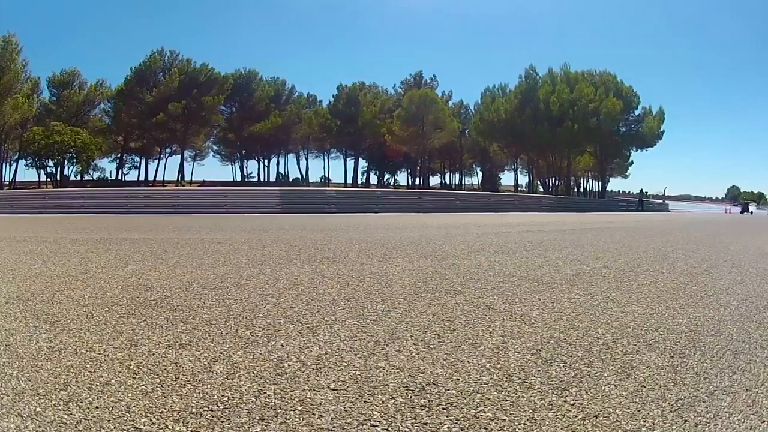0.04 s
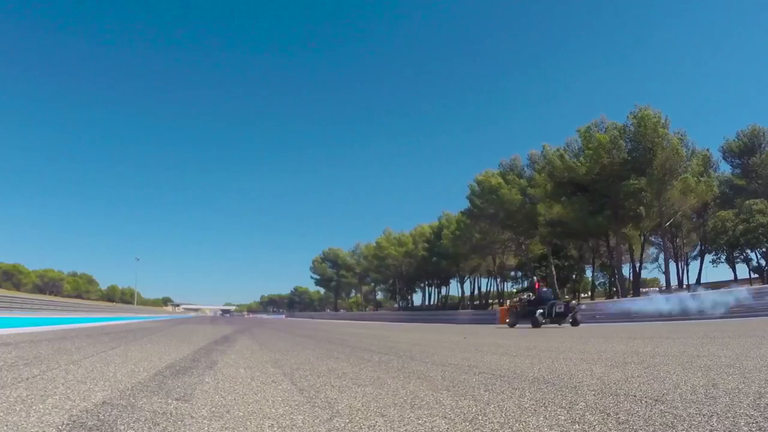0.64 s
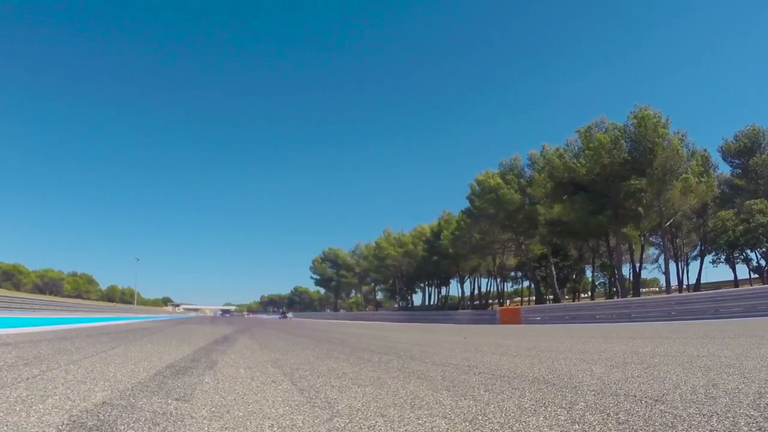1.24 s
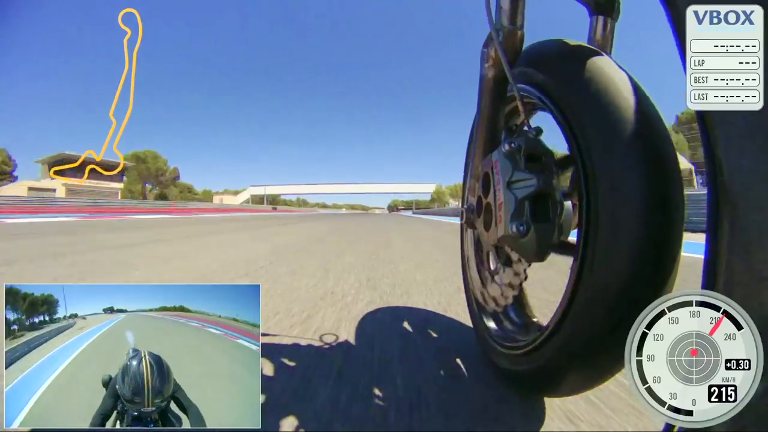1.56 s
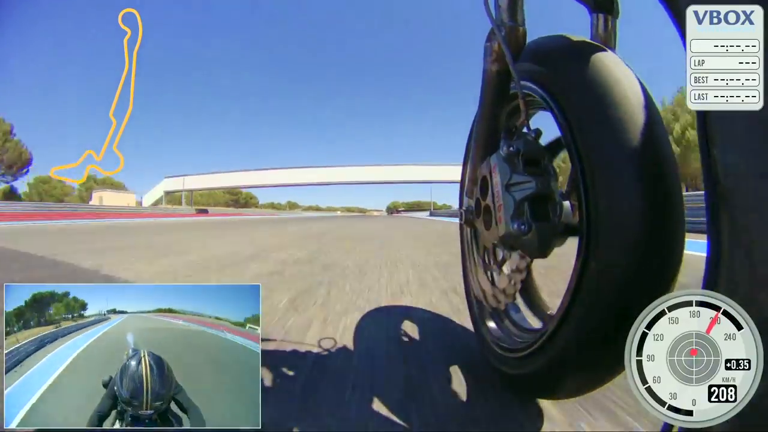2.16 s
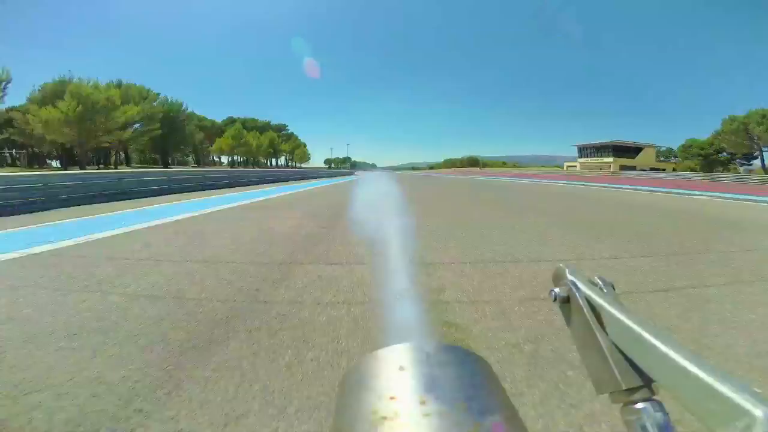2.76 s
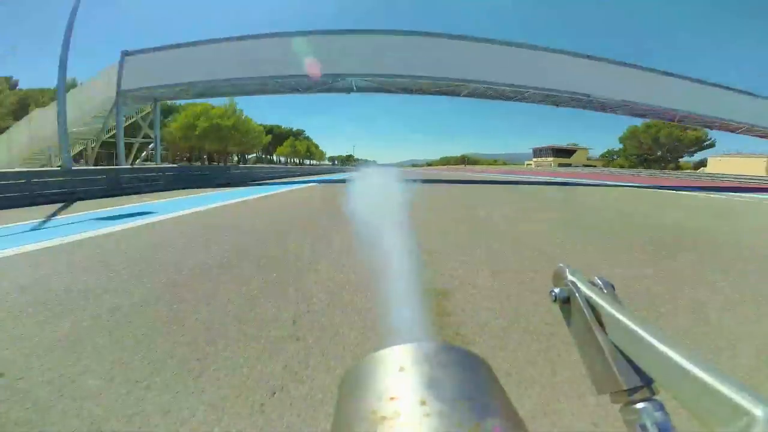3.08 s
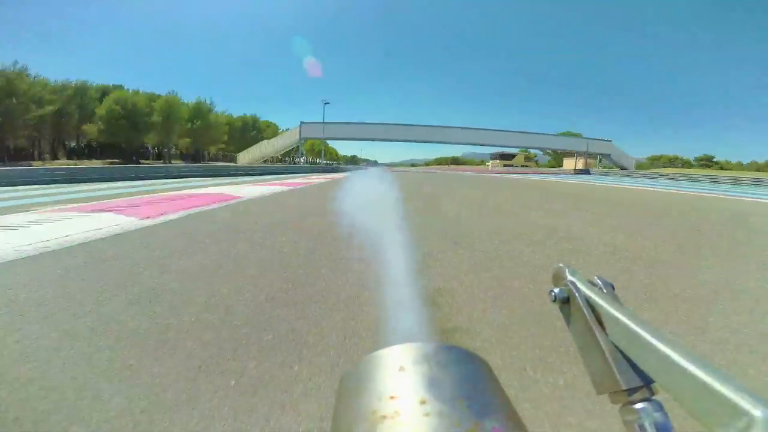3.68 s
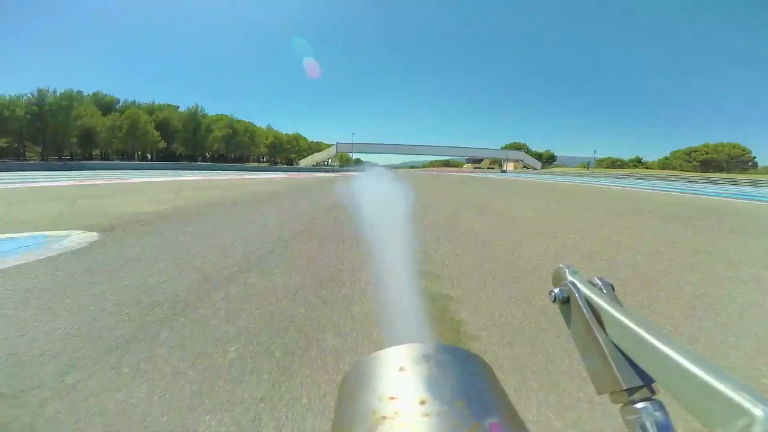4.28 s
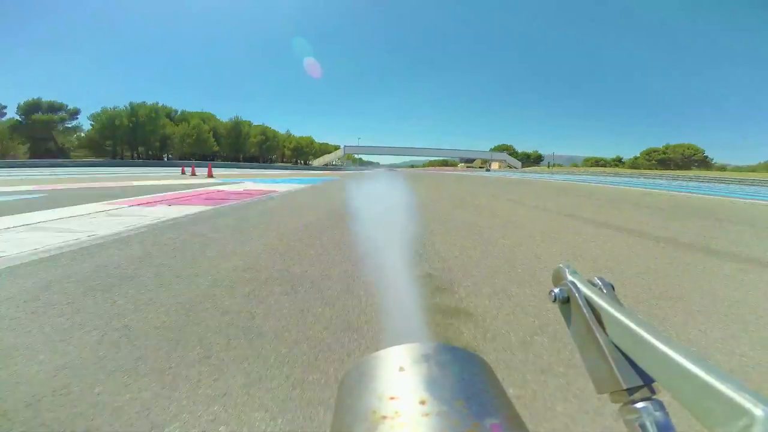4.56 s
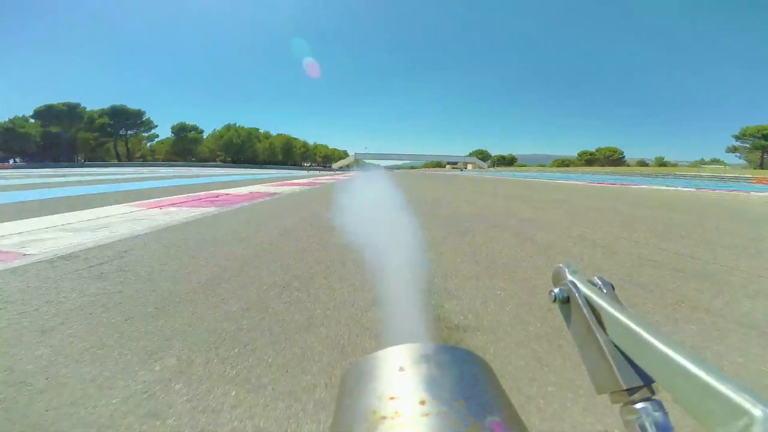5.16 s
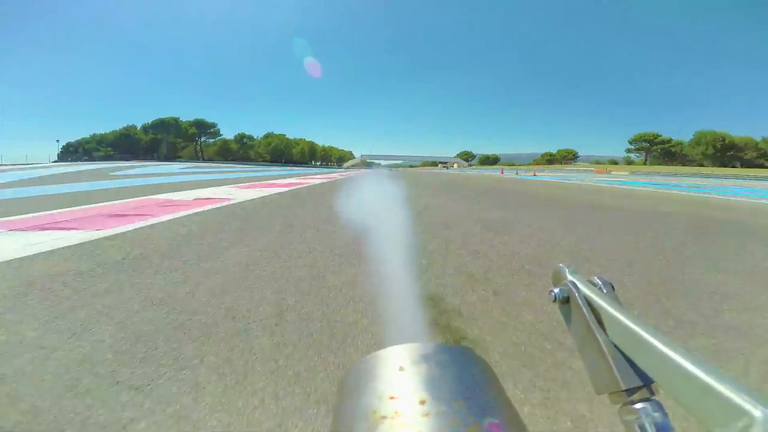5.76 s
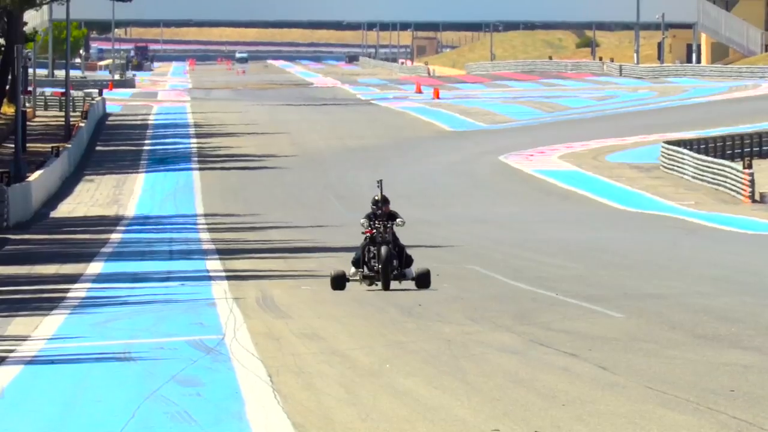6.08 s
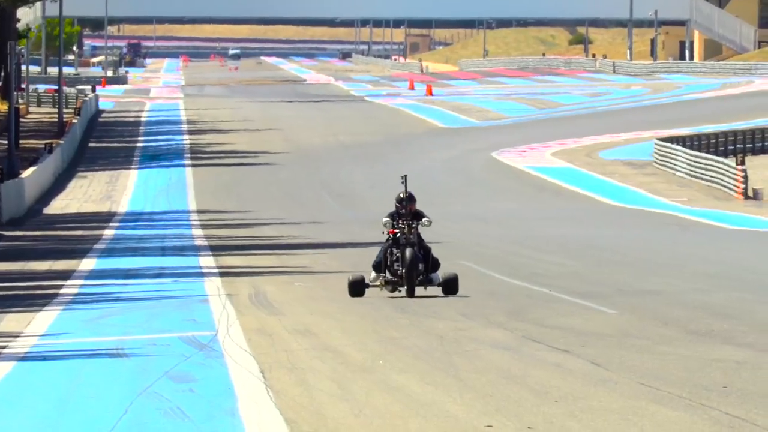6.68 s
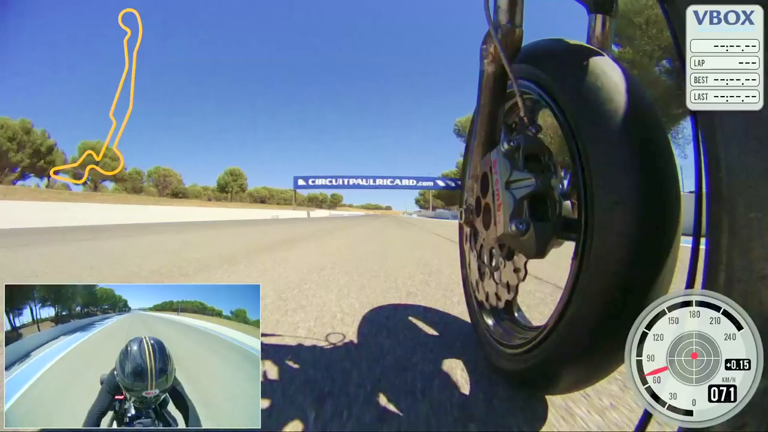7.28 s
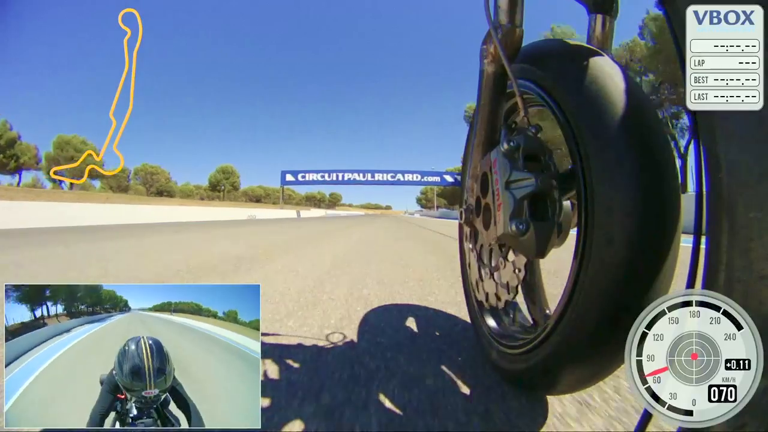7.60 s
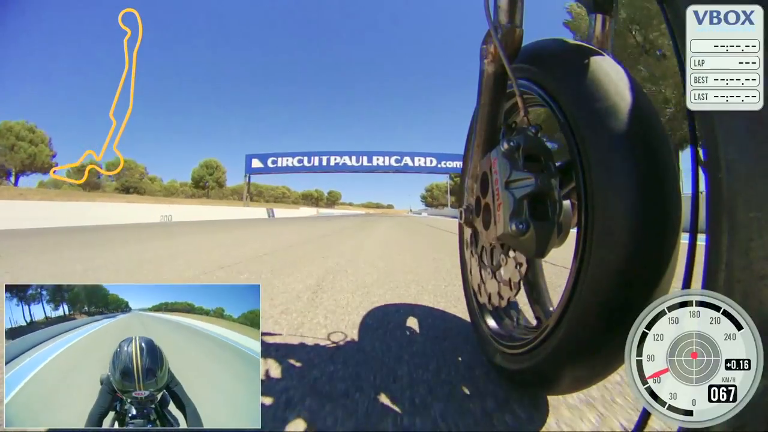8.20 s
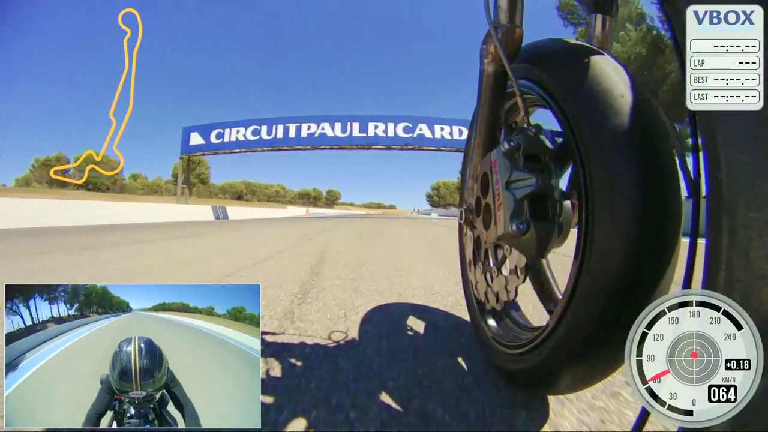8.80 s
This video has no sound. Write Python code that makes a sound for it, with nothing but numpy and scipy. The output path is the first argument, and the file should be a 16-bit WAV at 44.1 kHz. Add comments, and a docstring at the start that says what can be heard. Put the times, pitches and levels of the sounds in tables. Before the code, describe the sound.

A steam-jet vehicle roars past, then heavy wind buffets the microphone and a nozzle hiss becomes a rising whistle, followed by gentler gusts.

```python
"""A steam-rocket trike on a race track, heard from five places in turn.
First its turbulent jet roars past the trackside. From 1.4 s fast airflow batters and overloads a microphone
by the front wheel. From 2.8 s, at the rear, the wake thumps while a hissing nozzle resonance locks into a
whistle that rises and fades as the tank empties. From 5.9 s gusts hit a standing microphone, with steam
far off. From 7.3 s the trike coasts slowly, with gentler wind, faint tyre hiss and sharp pops."""
import sys
import numpy as np
from scipy import signal
from scipy.fft import rfft, irfft
from scipy.io import wavfile

SR = 44100
rng = np.random.default_rng(int(sys.argv[2]) if len(sys.argv) > 2 else 0)


def pcm_store(signal):
    """Save signal as 16-bit PCM."""
    levels = np.round(np.clip(np.atleast_2d(signal), -1, 1) * 32767)
    wavfile.write(sys.argv[1], SR, levels.astype(np.int16).T)


N = 389844
T = np.arange(N) / SR
HZ = np.fft.rfftfreq(N, 1 / SR)
BURST_T = np.arange(-512, 513) / SR  # time about the centre of a short burst [s]
CALM_FROM_S, CALM_FALL_S = 4.3, 0.24  # the wake leaves the rear microphone


def jet_fly_by(first_abreast_s=0.47, second_abreast_s=0.645, echo_s=0.00285, ground_echo_s=0.00072,
               beam_s=0.664, beam_width_s=0.09936):
    """Spherical spreading: jet noise swells and fades past two microphones; reflections comb it."""
    # Spectra of the jet's roar and hiss, coming, passing and leaving: (frequency [Hz], level [dB])
    coming_spectrum = [(29, -65.5), (50, -32.5), (76, -14), (217, -14.5), (291, -13.5), (359, -16),
                       (569, -9), (687, -24.5), (1020, -13), (1300, -17.5), (1560, -14), (2470, -3.5),
                       (3180, -16.5), (3750, -16.5), (7500, -22), (9750, -54), (16500, -120)]
    passing_hiss_spectrum = [(1760, -38.5), (3000, -47.5), (3590, -6), (4170, 9), (4850, 3), (5160, 2),
                             (5840, 6), (7380, 6.5), (9320, -7.5), (10800, -4.5), (15500, -26)]
    passing_roar_spectrum = [(59, -91), (100, -38.5), (162, -10.5), (327, -25), (362, -15.5), (546, -22),
                             (731, -17), (1040, -6.5), (1810, -2.5), (3300, -14.5), (4290, -46),
                             (7260, -120)]
    leaving_spectrum = [(120, -45), (200, -7), (258, -12), (467, -5), (540, -4.5), (591, -13), (1070, -7),
                        (1380, -27.5), (1690, -14), (2420, -8.5), (3170, -33), (4160, -15.5), (6770, -17.5),
                        (9720, -28), (15000, -50.5)]
    # Background rumble at the trackside: (frequency [Hz], level [dB])
    trackside_spectrum = [(13, -39), (22, -9), (47, -1.5), (70, -15), (120, -12), (258, -10.5), (453, -9),
                          (700, -19), (910, -58.5), (1540, -120)]
    # Two bands of jet sizzle, plus a thin high fizz near 14.8 kHz, a digital mirror image of the
    # 9 kHz band: (centre [Hz], width [Hz], level [dB])
    treble_bands = [(3750, 190, -5.5), (8980, 1020, 1.5), (14800, 600, -3.5)]
    # The howl rises on the way in and drops abreast: (time [s], centre [Hz])
    howl_path = [(0, 2254), (.3, 2500), (.59, 2796), (.61, 2247), (.8, 2059)]
    # Brief flares of the jet: (time [s], half length [s], gain [dB])
    flares = [(0.316, .014, 2), (0.454, 0.01, 3), (.61, .018, 5.5), (0.677, 0.024, 3)]
    first = nearness(first_abreast_s, distance_m=6.84)
    second = nearness(second_abreast_s, distance_m=3.3)
    howl = band(np.interp(T, *np.transpose(howl_path)), 260)
    roar = noise(coming_spectrum) + amp(-4) * howl
    roar = filtered(roar, 1 + 0.26 * np.exp(-2j * np.pi * HZ * echo_s))
    dull = filtered(roar, 1 / (1 + (HZ / 4500) ** 4))
    roar = dull + (0.39 + first) * (roar - dull)  # it brightens as it nears
    treble = sum(amp(db) * band(hz, width) for hz, width, db in treble_bands)
    coming_gain = amp(-24.5 - 5 * ramp(0.55, 0.05)) * first ** 0.94
    coming = coming_gain * (unit_rms(roar) + amp(-3) * unit_rms(treble))
    hiss = noise(passing_hiss_spectrum)
    hiss = unit_rms(hiss + 0.45 * np.interp(T - ground_echo_s * second, T, hiss))
    beam = 1 / (1 + ((T - beam_s) / beam_width_s) ** 4)  # the hiss sweeps over the second microphone
    close_roar = unit_rms(noise(passing_roar_spectrum) + amp(-1) * howl)
    passing = amp(-23) * beam * hiss + amp(-24) * second * close_roar
    leaving = amp(-23) * second ** 0.94 * noise(leaving_spectrum)
    away = ramp(0.66, 0.17)
    going = np.sqrt(1 - away) * passing + np.sqrt(away) * leaving
    going += amp(-46.5) * noise(trackside_spectrum)
    swirl = amp(surge_db(flares) + 0.98 * wander(60))
    return swirl * (coming * during(-1, 0.6) + going * during(0.6, 1.402))


def nozzle(eddies, catch_s=3.963, lock_s=4.36, break_s=4.947, fade_s=5.435, unlock_s=5.56,
           catch_hz=4187, rise_hz_per_s=405, bend_hz_per_s2=185, jitter_hz=24):
    """Flow-excited resonance: a broad hiss locks into a whistle that climbs as the tank empties."""
    # Turbulent hiss of the steam jet: (frequency [Hz], level [dB])
    steam_spectrum = [(1200, -13.5), (2400, -11.5), (3100, -22.5), (3800, -11.5), (5000, 1.5), (6400, -1),
                      (7400, -18.5), (8800, -16.5), (11000, -27), (14000, -39.5), (16000, -58)]
    age = T - catch_s
    pitch = catch_hz + rise_hz_per_s * age + bend_hz_per_s2 * age ** 2 + 8 * wander(10)
    building, caught = ramp(3.55, 0.45), ramp(catch_s, 0.03)
    locked, frayed = ramp(lock_s - 0.03, 0.043), ramp(unlock_s, 0.18)
    # The whistle breaks off once, then weakens as the pressure runs out.
    strength = amp(-16 * swell(break_s, 0.014) - 150 * np.clip(T - fade_s, 0, 1) ** 2)
    # Each wake eddy upsets the tone and spills steam.
    shaken = np.minimum(sum(swell(s, 0.0048) for s, _ in eddies), 1)
    jitter = jitter_hz * (1 + 1.33 * shaken + 2 * frayed) * wander(150)
    phase = 2 * np.pi * np.cumsum(pitch + jitter) / SR
    tone = unit_rms(np.sin(phase) * amp(2.5 * wander(99))) * (1 - 0.38 * shaken)
    tone = (1 - frayed) * tone + amp(-6) * np.sqrt(frayed * (1 - frayed / 2)) * band(pitch, 170)
    octave = amp(-32) * locked * (1 - frayed) * band(2 * pitch, 190)
    stutter_db = (1 - locked) * (-7 + 4 * np.tanh(wander(25)))
    whistle = caught * amp(-24 + stutter_db) * (tone + octave)
    settling_hz = 4230 - 340 * np.exp(-np.maximum(T - 2.84, 0) / 0.3)
    hiss_hz = settling_hz + caught * np.maximum(pitch - settling_hz, 0)  # it follows the whistle up
    hiss = amp(-31 - 13 * ramp(catch_s, 0.46)) * band(hiss_hz, 520)
    upper_resonance = amp(-40.5) * building * (1 - locked) * band(1.24 * pitch, 200)
    # The steam builds, yields to the locked tone, then drains away.
    steam_db = -40 + 3.5 * building - 5.5 * locked - 3.5 * np.maximum(T - lock_s, 0)
    steam = amp(steam_db + 1.4 * wander(60) + 4.4 * shaken) * noise(steam_spectrum)
    sputter = amp(-51) * ramp(fade_s, 0.25) * band(7950, 1325)
    exhaust = amp(-6 * ramp(5.83, 0.08)) * (steam + sputter)
    return (strength * (whistle + hiss) + upper_resonance + exhaust) * during(2.838, 5.91)


def fast_wind(bursts_per_s=240, burst_s=0.00057, ceiling=0.24):
    """Flow separation: air tears off the front microphone in millisecond bursts and saturates it."""
    # Spectra of the fast wind and of its crackle: (frequency [Hz], level [dB])
    wind_spectrum = [(12, -45), (20, -15), (54, 0), (102, 2.5), (157, 2), (372, -6), (417, -7.5),
                     (572, -10), (1350, -11.5), (1950, -18), (4020, -38), (4500, -55), (5850, -65),
                     (9900, -120)]
    crackle_spectrum = [(1760, -28), (3000, -6.5), (4050, -7), (8760, -7.5), (15100, -17.5), (16000, -13)]
    # Surges of the wind: (time [s], half length [s], gain [dB])
    surges = [(1.47, .045, 2.5), (1.76, .05, 1.5), (1.99, .05, 2), (2.705, .04, 4.5), (2.8, .03, 2)]
    # The flow stalls, then slaps the microphone: (time [s], relative peak [dB], lull before it [s])
    slaps = [(1.404, -22, .004), (1.5, -11, 0.015), (1.539, -13, .012), (1.576, -8.5, .016),
             (1.633, -18, 0.049), (1.657, -22, .02), (1.94, -9, .05), (1.979, -14, .012), (2.116, -12, .02),
             (2.153, -12, .014), (2.201, -19, 0.034), (2.235, -10, .016), (2.458, -14, .03),
             (2.486, -19, .02), (2.529, -17, .025), (2.658, -17, 0.034)]
    rumble, flutter = split(noise(wind_spectrum), 450)
    fizz = noise(crackle_spectrum)
    extra_db = surge_db(surges)
    stalled = np.minimum(sum(swell(s - lull_s / 2, lull_s / 2) for s, _, lull_s in slaps), 1)
    flow = 1 - 0.8 * stalled
    rate = bursts_per_s * flow * amp(extra_db + 4.5 * wander(50))
    shed = np.floor(np.cumsum(rate * amp(4 * wander(400))) / SR)  # eddies break away unevenly
    clicks = np.diff(shed, prepend=0) * rng.uniform(0.21, 1, N) ** 2
    bursts = np.sqrt(abs(signal.oaconvolve(clicks, np.exp(-2 * (BURST_T / burst_s) ** 2), "same")))
    bursts /= np.std(bursts[round(1.5 * SR):round(2.8 * SR)]) * np.sqrt(2)
    tearing = amp(-24.8 + extra_db / 2) * flutter * (0.28 * flow + bursts)
    crackle = amp(-37.5 + extra_db / 2) * fizz * (0.3 + 0.56 * bursts ** 2)
    pressure = amp(-22) * rumble * (0.64 + 0.34 * flow) + tearing + crackle
    slap = flutter + amp(-14.5) * fizz
    for s, db, _ in slaps:
        add_burst(pressure, s, amp(db + 3) * snap(slap, s, 0.0013))
    return ceiling * np.tanh(pressure / ceiling) * during(1.401, 2.838)


def wake_eddies(weak_count=9, weak_db=-32, scatter_db=4.5, span_s=0.53):
    """Intermittency: the thinning wake arrives as single eddies, loud ones and weak random ones."""
    # The loudest eddies at the rear microphone: (time [s], relative peak [dB])
    loud_eddies = [(4.463, -22.5), (4.57, -29), (4.638, -28), (4.779, -31), (4.983, -29.5), (5.05, -25.5),
                   (5.084, -30), (5.104, -26), (5.193, -29), (5.237, -29), (5.252, -30), (5.279, -20.5),
                   (5.311, -25), (5.364, -26), (5.385, -24)]
    place, size = rng.random((weak_count, 2)).T
    times = CALM_FROM_S + CALM_FALL_S + span_s * (np.arange(weak_count) + place) / weak_count
    return loud_eddies + list(zip(times, weak_db + scatter_db * (2 * size - 1)))


def rear_wind(eddies, calm_until_s=5.455, thump_hz=150, drone_hz=180):
    """Wake turbulence buffets the rear microphone, thinning for a second to separate thumps."""
    # Pressure of the wake on the microphone: (frequency [Hz], level [dB])
    wake_spectrum = [(12, -65), (20, -33), (39, -36.5), (57, -8), (107, -1.5), (135, -6), (170, -2),
                     (484, -13.5), (801, -17.5), (2240, -25.5), (3000, -35.5), (3900, -69.5), (6600, -120)]
    gone, back = ramp(CALM_FROM_S, CALM_FALL_S), ramp(calm_until_s, 0.036)
    rumble_gain = amp(-28 * (1 - gone) - 60 * (gone - back) - 31 * back)
    flutter_gain = amp(-40 * (1 - gone) - 59 * (gone - back) - 45.5 * back)
    out = wind((rumble_gain, flutter_gain), wake_spectrum, split_hz=403, eddy_hz=49.8, swing_db=(3, 3.5))
    droning = ramp(3.59, 0.43) * (1 - gone) ** 2  # for a while the frame sheds its eddies regularly
    out = out * (1 - 0.24 * droning) + amp(-32) * droning * band(drone_hz, 35)
    puff = band(290, 1200)
    for s, db in eddies:
        swing = flap(thump_hz * rng.uniform(0.7, 1.3), fall_s=0.0055, width_s=0.0046)
        add_burst(out, s, amp(db - 1.5) * (swing + amp(-8) * snap(puff, s, 0.0029)))
    return out * during(2.838, 5.91)


def standing_gusts(blast_s=0.00599):
    """Partial coherence: gusts reach a standing microphone's two ports unequally; steam hisses far off."""
    # Gusts: (time [s], half length [s], rumble level [dB], flutter level [dB])
    gusts = [(5.94, .025, -34.5, -46), (6.025, 0.02, -31, -42), (6.235, 0.019, -29, -41),
             (6.31, 0.05, -30.5, -36), (6.375, .018, -23, -31), (6.44, 0.033, -24.5, -30),
             (6.56, 0.041, -19.5, -27), (6.66, 0.062, -25, -34), (6.83, .028, -29.5, -37.5),
             (7.08, 0.048, -22, -27.5), (7.22, 0.037, -24, -34.5), (7.28, 0.024, -28.5, -25.5)]
    # Their hardest shoves: (time [s], relative peak [dB])
    blasts = [(6.552, -6.5), (6.569, -14), (6.624, -12), (6.811, -20), (7.055, -16), (7.279, -9.5)]
    # Spectra of the gusts and of the distant steam: (frequency [Hz], level [dB])
    gust_spectrum = [(12, -60), (20, -44), (75, -5), (123, 1.5), (174, -2.5), (256, -5.5), (534, -19.5),
                     (621, -23.5), (1140, -35.5), (1440, -44), (3500, -66.5), (4550, -90), (7700, -120)]
    far_steam_spectrum = [(1470, -11), (2500, -15.5), (3740, -24.5), (4960, -7), (6070, -19.5),
                          (7010, -16.5), (7860, -25.5), (8580, -31.5), (13200, -37.5), (14000, -35)]
    gains = gust_gains(gusts, rumble_db=-41, flutter_db=-48)
    mid, side = (wind(gains, gust_spectrum, split_hz=304, eddy_hz=40.4, swing_db=(2.6, 3))
                 for _ in range(2))
    side = filtered(side, HZ ** 2 / (HZ ** 2 + 140 ** 2) / (1 + (HZ / 2500) ** 2))
    shove = band(310, 340)
    for s, db in blasts:
        add_burst(mid, s + blast_s, amp(db - 4) * snap(shove, s, blast_s))
        add_burst(side, s + blast_s, amp(db - 4) * 0.7 * snap(shove, s - 1, blast_s))
    ports = np.array([mid + 0.9 * side, mid - 0.9 * side])
    return (ports + amp(-62) * noise(far_steam_spectrum)) * during(5.91, 7.31)


def coasting(step_s=8.08):
    """Turbulence at low speed: gentler wind by the front wheel, faint tyre hiss and sharp pops."""
    # Gusts: (time [s], half length [s], rumble level [dB], flutter level [dB])
    gusts = [(7.44, 0.048, -30, -57), (7.73, .022, -25, -45.5), (8.24, 0.048, -23.5, -41)]
    # Spectra of the slow wind and of the tyre hiss: (frequency [Hz], level [dB])
    wind_spectrum = [(12, -46), (20, -30), (47, 1), (76, 0.5), (262, -10), (408, -17), (498, -17.5),
                     (581, -23), (742, -22.5), (1130, -28.5), (1290, -25.5), (4000, -61), (5200, -95),
                     (8800, -120)]
    tyre_spectrum = [(2060, -33), (3500, -6), (4810, 4.5), (8690, 3.5), (14600, -1), (16000, -5)]
    # Pops on the front microphone: (time [s], relative peak [dB], centre [Hz])
    pops = [(7.3463, -16, 920), (7.368, -22, 930), (7.417, -13, 499), (7.442, -33, 1030),
            (7.451, -18, 1096), (7.463, -18, 880), (7.584, -19.5, 890), (7.628, -24, 910),
            (7.691, -28, 1050), (7.712, -22, 970), (7.739, -16, 400)]
    step = ramp(step_s, 0.14)  # wind and hiss step up together
    gains = gust_gains(gusts, rumble_db=-34 + 8 * step, flutter_db=-49 + 9.5 * step)
    out = wind(gains, wind_spectrum, split_hz=510, eddy_hz=91, swing_db=(3, 1.3))
    out += amp(-74.5 + 12 * step) * noise(tyre_spectrum)
    crack = noise([(200, 15), (1500, 4), (2300, -10), (3400, -37), (8000, -45)])
    thud = amp(-7) * np.exp(-(BURST_T / 0.0012) ** 2)
    for s, db, hz in pops:
        knock = flap(hz, fall_s=0.0014, width_s=0.00098)
        add_burst(out, s, amp(db - 2) * (knock + thud + amp(-5) * snap(crack, s, 0.0014)))
    return out * during(7.31, 10)


def wind(gains, spectrum, split_hz, eddy_hz, swing_db):
    """Amplitude modulation by eddies; gains and swing_db are pairs for (rumble, flutter above it)."""
    rumble, flutter = split(noise(spectrum), split_hz)
    eddies = np.tanh(wander(eddy_hz) / 2) * 2
    rumble = unit_rms(rumble * amp(swing_db[0] * eddies))
    flutter = unit_rms(flutter * amp(swing_db[1] * eddies))
    return gains[0] * rumble + gains[1] * flutter


def gust_gains(gusts, rumble_db, flutter_db):
    """Incoherent addition: gusts add their power to a wind, giving the gains of rumble and flutter."""
    rumble, flutter = amp(rumble_db) ** 2, amp(flutter_db) ** 2
    for s, width_s, low_db, high_db in gusts:
        gust = swell(s, width_s)
        rumble = rumble + gust * amp(low_db) ** 2
        flutter = flutter + gust * amp(high_db) ** 2
    return np.sqrt(rumble), np.sqrt(flutter)


def flap(hz, fall_s, width_s):
    """An eddy crossing a microphone: a short pressure swing of zero mean that falls in pitch."""
    pitch = hz * np.exp(np.minimum(-BURST_T / fall_s, 2))
    envelope = np.exp(-(BURST_T / width_s) ** 2)
    swing = np.sin(2 * np.pi * (np.cumsum(pitch) / SR + rng.random()))
    return envelope * (swing - np.average(swing, weights=envelope))


def snap(source, s, width_s):
    """Gaussian windowing: a short burst of a noise, with a peak of 1."""
    burst = source[round(s * SR):][:len(BURST_T)] * np.exp(-(BURST_T / width_s) ** 2)
    return burst / abs(burst).max()


def nearness(abreast_s, distance_m, speed_m_per_s=67):
    """Inverse-distance law: the gain of a passing source, 1 at its closest."""
    return distance_m / np.hypot(distance_m, speed_m_per_s * (T - abreast_s))


def band(hz, width_hz):
    """Narrow-band noise of rms 1; frequency shifting lets its centre follow a curve."""
    centre = np.mean(hz)
    skirt = 1 / (1 + ((HZ - centre) / width_hz) ** 2) ** 2
    if np.ndim(hz) == 0:
        return gaussian_noise(skirt)
    still = np.fft.ifft(skirt * np.exp(2j * np.pi * rng.random(len(HZ))), N)
    return unit_rms((still * np.exp(2j * np.pi * np.cumsum(hz - centre) / SR)).real)


def noise(spectrum):
    """Spectral shaping: noise of rms 1 from (frequency [Hz], level [dB]), falling beyond the ends."""
    hz, db = np.transpose(spectrum)
    f = HZ[HZ < 2 * hz[-1]]
    gain = amp(np.interp(np.log(f + 1), np.log(hz), db)) / np.maximum(f / hz[-1], 1) ** 4
    return gaussian_noise(gain * np.minimum(f / hz[0], 1) ** 2)


def gaussian_noise(gain):
    """Fourier synthesis: noise of rms 1 with the given gain in its lowest frequency bins."""
    bins = rng.standard_normal(len(gain)) + 1j * rng.standard_normal(len(gain))
    return unit_rms(irfft(gain * bins, N))


def wander(rate_hz, size=16384):
    """Band-limited random motion of rms 1, up to about the given rate, without slow drift."""
    f = HZ[:size // 2 + 1]
    gain = np.exp(-(f / rate_hz) ** 2) * f / (f + rate_hz / 10)
    slow = unit_rms(irfft(gain * np.exp(2j * np.pi * rng.random(len(f))), size))
    return np.interp(T, np.linspace(0, T[-1], size), slow)


def split(x, hz):
    """Crossover: the parts of a sound under and over a frequency, each of rms 1."""
    low_power = 1 / (1 + (HZ / hz) ** 8)
    return unit_rms(filtered(x, np.sqrt(low_power))), unit_rms(filtered(x, np.sqrt(1 - low_power)))


def filtered(x, gain):
    """Linear filtering by a gain for each frequency."""
    return irfft(rfft(x) * gain, N)


def surge_db(rows):
    """Summed level of brief surges, from (time [s], half length [s], gain [dB])."""
    return sum(db * swell(s, width_s) for s, width_s, db in rows)


def swell(s, width_s):
    """Gaussian pulse of height 1 around time s."""
    out = np.zeros(N)
    near = slice(*np.searchsorted(T, [s - 5 * width_s, s + 5 * width_s]))
    out[near] = np.exp(-((T[near] - s) / width_s) ** 2)
    return out


def ramp(start_s, length_s):
    """Linear rise from 0 to 1."""
    return np.clip((T - start_s) / length_s, 0, 1)


def during(start_s, end_s, fade_s=0.006):
    """Gate: 1 while a microphone is heard, with quick fades."""
    return np.clip((T - start_s) / fade_s + 0.5, 0, 1) * np.clip((end_s - T) / fade_s + 0.5, 0, 1)


def add_burst(mix, s, burst):
    """Superposition: mixes in a burst centred on time s."""
    part = mix[max(round((s + BURST_T[0]) * SR), 0):][:len(burst)]
    part += burst[:len(part)]


def amp(db):
    """Decibels to gain."""
    return 10 ** (np.asarray(db) / 20)


def unit_rms(x):
    """Scales to an rms of 1."""
    return x / np.sqrt(np.mean(x ** 2) + 1e-20)


def scene():
    """The five places follow one another; only the standing microphone is stereo."""
    eddies = wake_eddies()
    return jet_fly_by() + fast_wind() + nozzle(eddies) + rear_wind(eddies) + standing_gusts() + coasting()


def record(dry, cutoff_hz=15800):
    """Band limiting: a steep low-pass removes the highest treble."""
    low_pass = signal.firwin(511, cutoff_hz, window=("kaiser", 9), fs=SR)
    return signal.oaconvolve(dry, low_pass[None], "same")


dry = scene()
out = record(dry)
pcm_store(out)
```